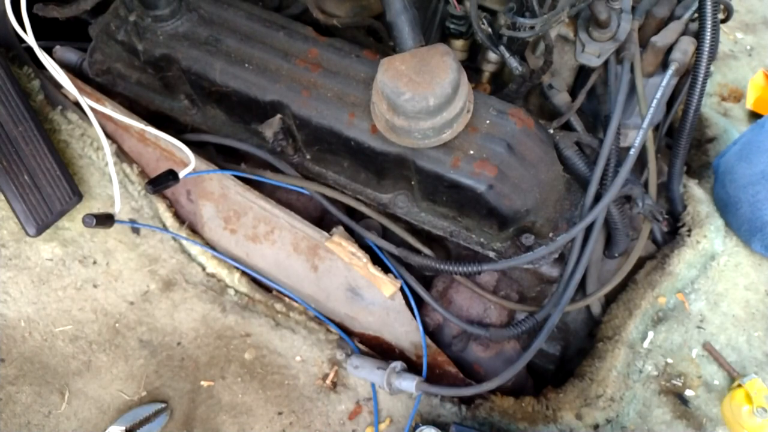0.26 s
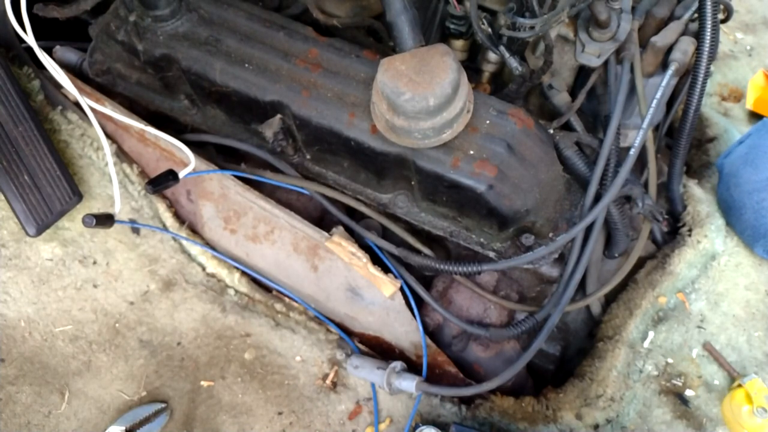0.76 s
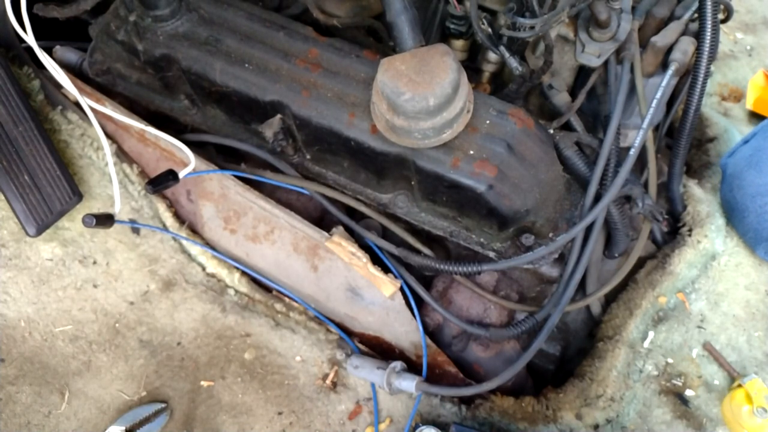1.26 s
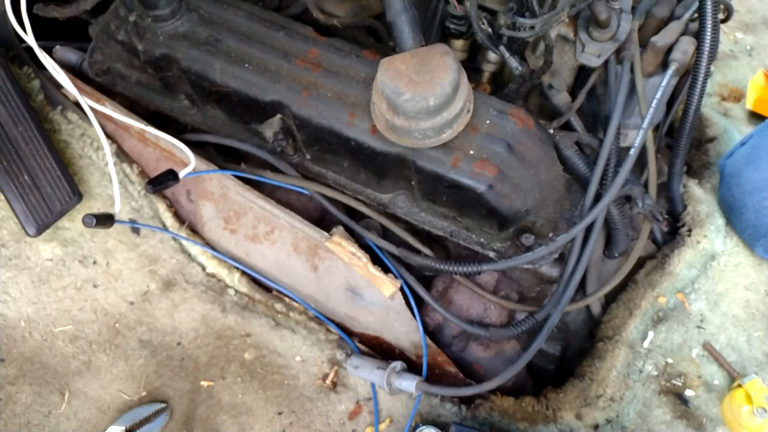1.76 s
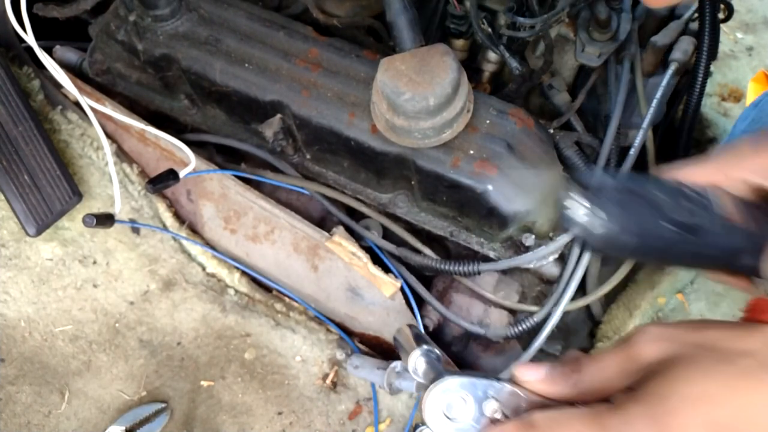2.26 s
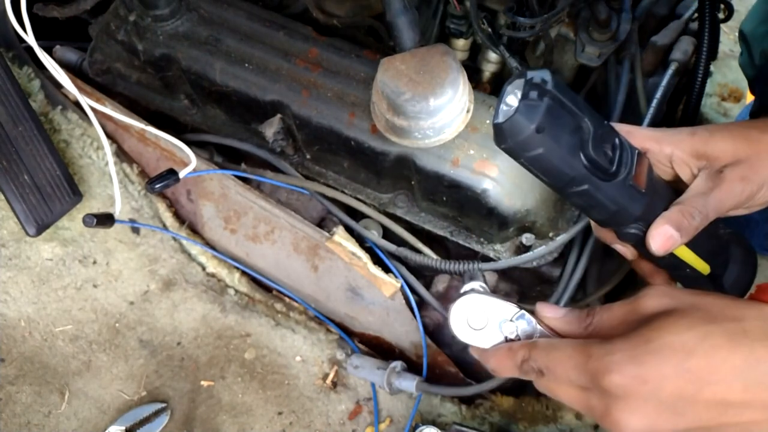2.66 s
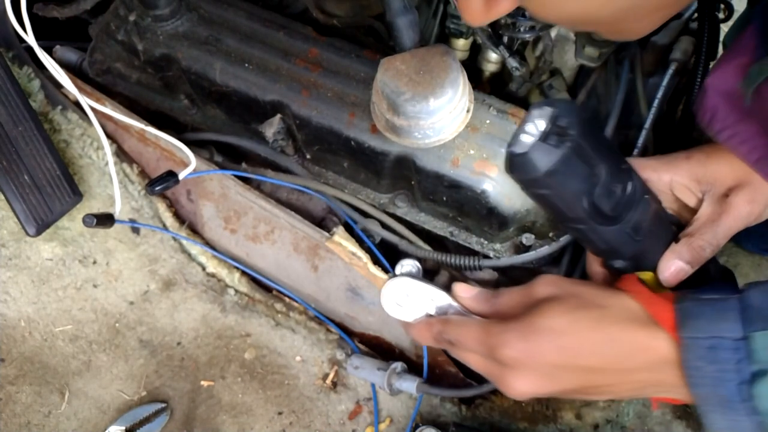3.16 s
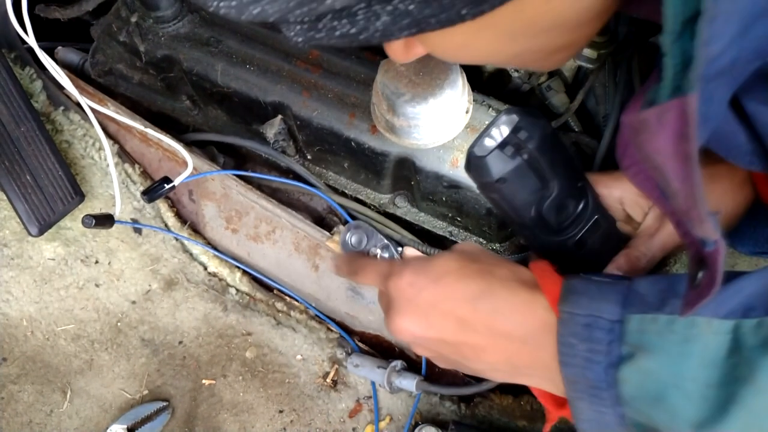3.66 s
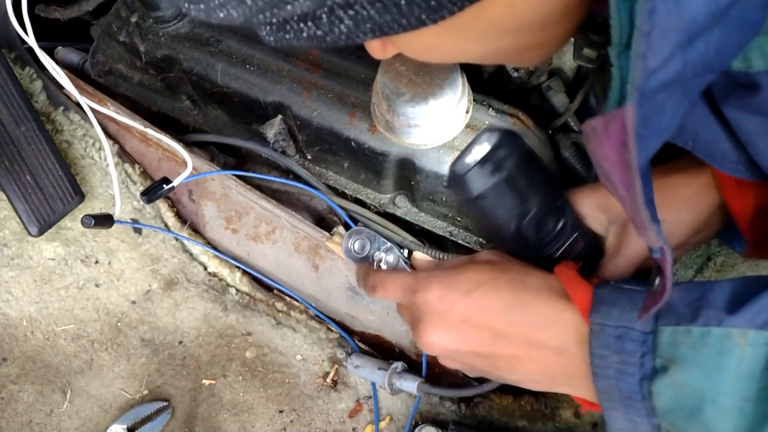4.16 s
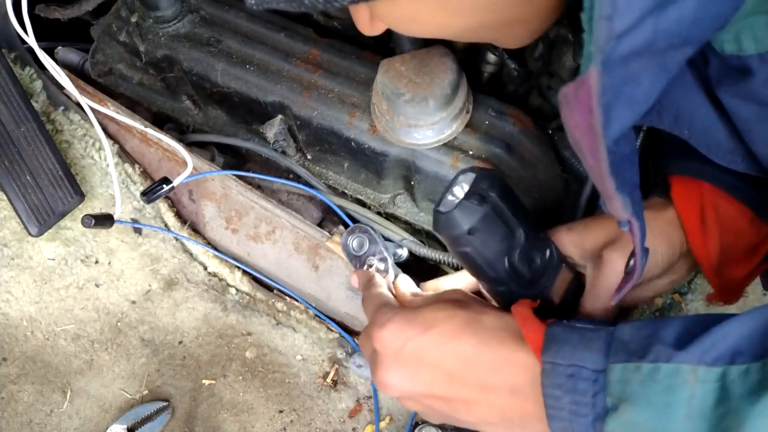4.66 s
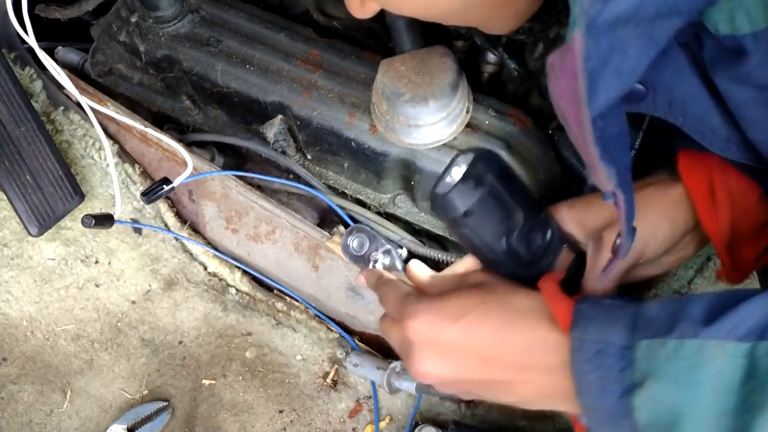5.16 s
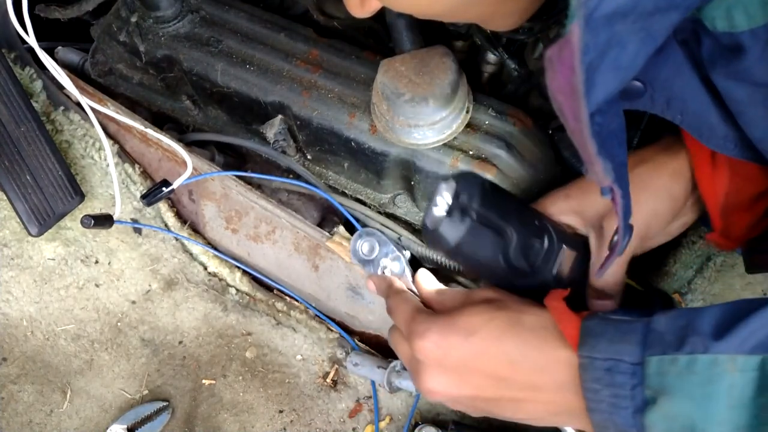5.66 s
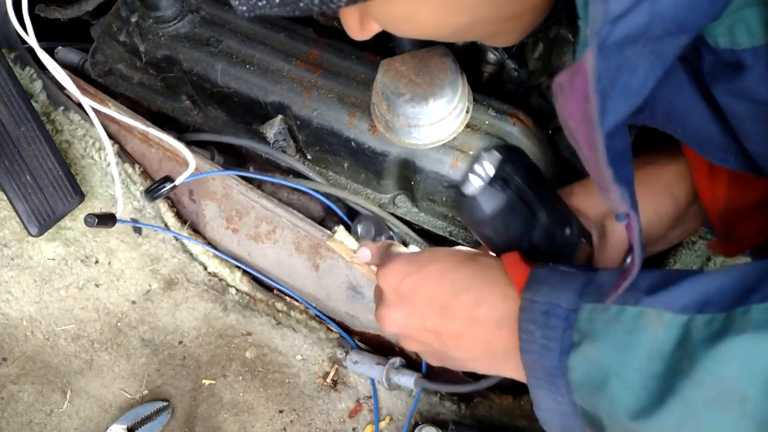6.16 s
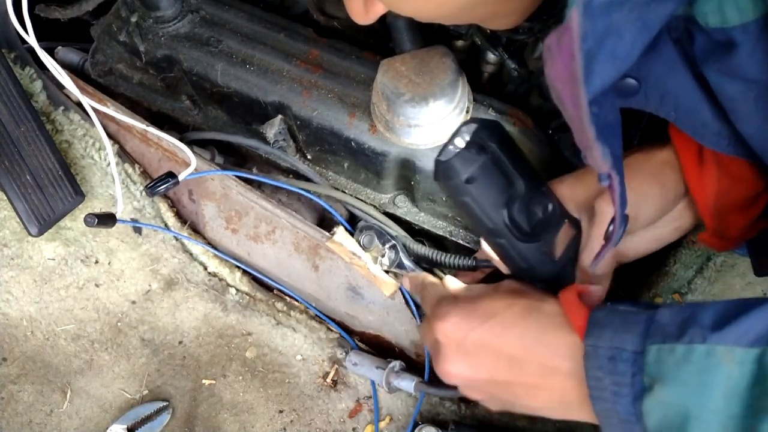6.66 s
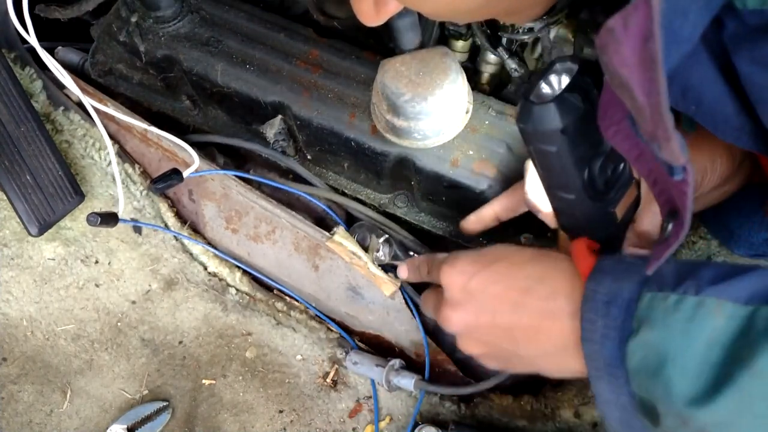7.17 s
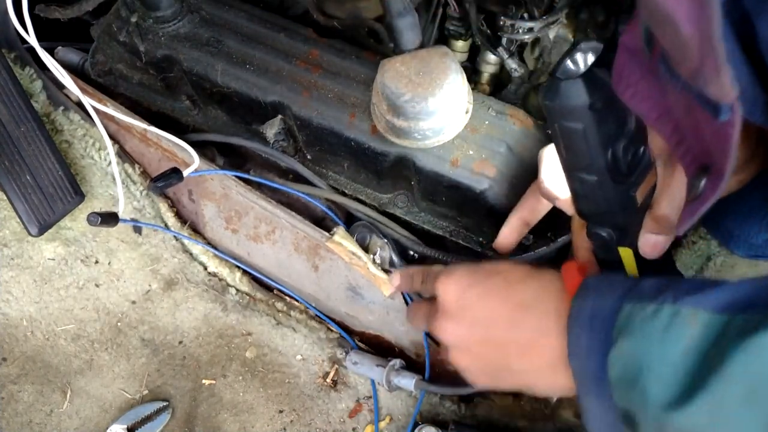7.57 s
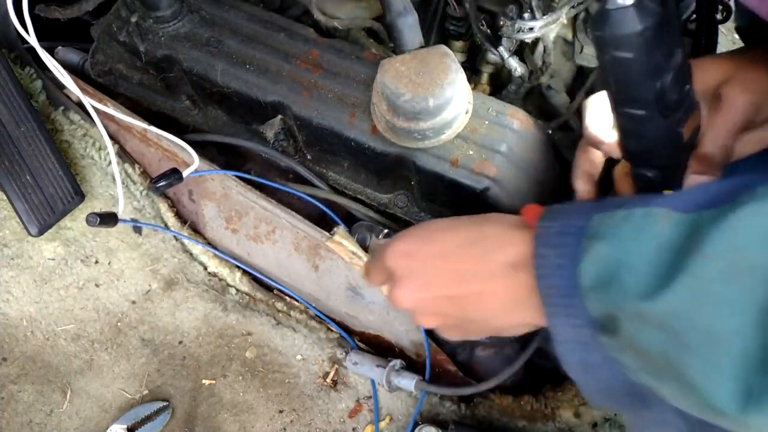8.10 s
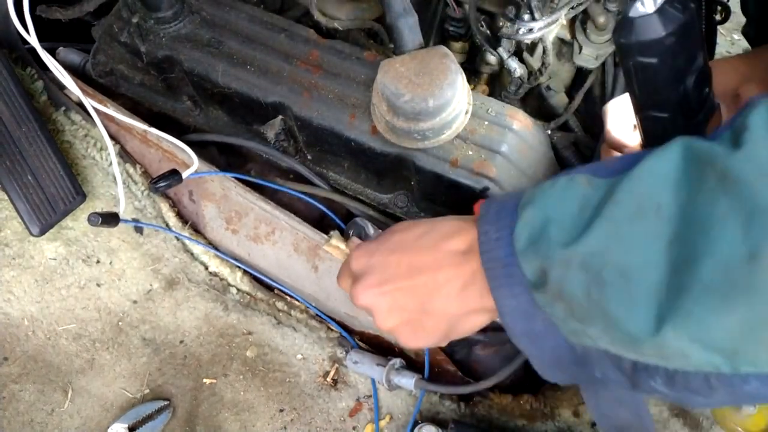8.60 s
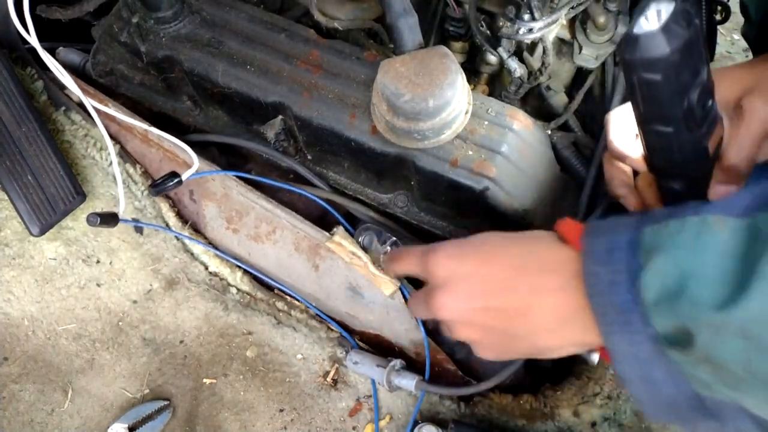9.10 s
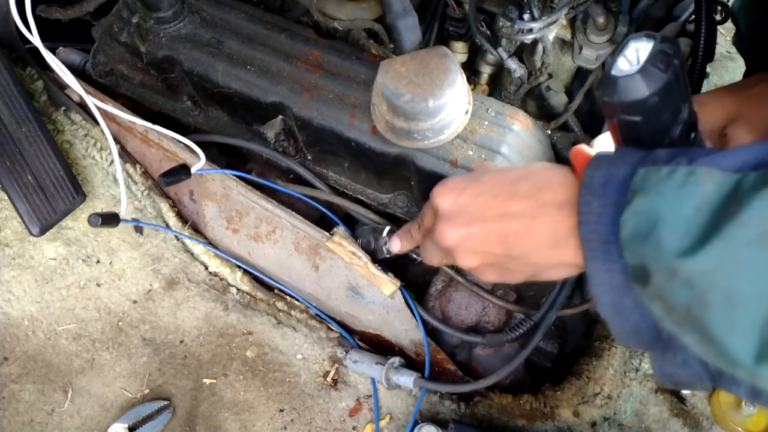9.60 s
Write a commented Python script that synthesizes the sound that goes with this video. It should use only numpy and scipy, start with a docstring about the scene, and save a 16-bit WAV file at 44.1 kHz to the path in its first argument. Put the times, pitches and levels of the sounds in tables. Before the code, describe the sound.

A ratchet with extension and socket is fitted onto an engine through a floor opening. Mostly quiet: cloth swishes, dull floor bumps, a short rough drag, bright clinks, sparse dry ticks and tiny steel scrapes. A clear tap comes past the middle, a hollow metal knock later, and a hard crack near the end. Faint outside traffic and a wavering low engine note sit under steady microphone hiss.

```python
"""In a van, a ratchet, extension and socket are worked down through the floor hatch onto an engine.
Struck steel rings as sums of decaying modes over dense noise; scrapes and drags are noise broken by slips.
A nylon sleeve rustles as grainy noise that swells with each stroke, and a small bird peeps in two pairs.
Traffic hums faintly outside as banded noise and one wavering tone, over a steady microphone hiss."""
import sys
import numpy as np
from scipy import signal
from scipy.fft import rfft, irfft
from scipy.io import wavfile

SR = 44100
rng = np.random.default_rng(int(sys.argv[2]) if len(sys.argv) > 2 else 0)


def dump(signal):
    """Clip the signal to [-1, 1] and save it as 16-bit WAV at the path in sys.argv[1]."""
    limited = np.clip(np.atleast_2d(signal).T, -1, 1)
    pcm = np.round(limited * 32767).astype(np.int16)
    wavfile.write(sys.argv[1], SR, pcm)


N = 433944
LEAD = 256  # samples kept before the onset of each blow
TIME = np.arange(N) / SR
AGE = (np.arange(24000) - LEAD) / SR  # seconds since the onset of a blow


def amp(db):
    """Logarithmic level: converts decibels to an amplitude gain."""
    return 10 ** (np.asarray(db) / 20)


def unit(x):
    """Energy normalisation: scales a signal to rms 1."""
    return x / np.sqrt(np.mean(x ** 2) + 1e-20)


def read(points, hz):
    """Logarithmic pitch scale: interpolates (Hz, value) points along log frequency."""
    f, value = np.transpose(points)
    return np.interp(np.log(hz + 1), np.log(f + 1), value)


def curves(rows):
    """Linear interpolation: draws each column of a time table sample by sample."""
    s, *columns = np.transpose(rows)
    return [np.interp(TIME, s, c) for c in columns]


def add(mix, s, sound):
    """Superposition: mixes a sound in, its onset LEAD samples after its first sample."""
    part = mix[:, max(round(s * SR) - LEAD, 0):][:, :sound.shape[-1]]
    part += sound[..., :part.shape[1]]


def likeness(hz):
    """Spatial coherence: two microphones hear the bass nearly alike and the treble unrelated."""
    return .95 / (1 + (hz / 500) ** 2)


def noise(colour, size, lo_hz=20, hi_hz=20000):
    """Filtered random noise: two partly coherent channels of rms 1 between two soft band edges."""
    hz = np.fft.rfftfreq(size, 1 / SR)
    a, b = rng.standard_normal((2, len(hz))) + 1j * rng.standard_normal((2, len(hz)))
    same = likeness(hz)
    pair = np.array([a, same * a + np.sqrt(1 - same ** 2) * b])
    low_edge, high_edge = 1 + (lo_hz / (hz + 1)) ** 10, 1 + (hz / hi_hz) ** 10
    edges = 1 / np.sqrt(low_edge * high_edge)
    return unit(irfft(pair * amp(read(colour, hz)) * edges, size))


def wander(per_s):
    """Random modulation: joins chance values, per_s of them a second, by lines at rms 1."""
    knots = rng.standard_normal(N // 20)
    return unit(np.interp(TIME * per_s, np.arange(len(knots)), knots))


def fade(t60, rise):
    """Exponential damping: a quick rise, then a decay of 60 dB in t60 seconds."""
    t = np.maximum(AGE, 0)
    return (1 - np.exp(-t / rise)) * np.exp(-np.log(1000) * t / t60)


# Ringing time of the engine bay and the cab, scaled by the length of each blow.
# Each row: frequency in Hz, decay time t60 in seconds.
SPACE_T60 = [(100, 0.69), (350, 0.3), (900, .13), (2000, 0.15), (5000, 0.087), (10000, 0.061),
             (16000, 0.05)]


def strike(modes, clang, mode_db, crack_db, rise, length=0.95, damping=1.):
    """Modal superposition: a contact crack, a dense clang damped band by band, and the part's clear modes."""
    dense = noise(clang, len(AGE), lo_hz=65)
    hz, spectrum = np.fft.rfftfreq(len(AGE), 1 / SR), rfft(dense)
    centres, t60s = np.transpose(SPACE_T60)
    out = amp(crack_db) * dense * fade(0.014, rise / 2)
    for share, t60 in zip(np.eye(len(centres)), t60s):
        band = irfft(spectrum * read(np.c_[centres, share], hz))
        out += band * fade(t60 * length, rise)
    ring = np.zeros_like(out)
    for f, db, t60 in modes:
        # short waves reach the two microphones out of step
        lag = (1 - likeness(f / 2)) * rng.uniform(-1.4, 1.9, (2, 1))
        phase = 2 * np.pi * rng.random() + lag
        # low modes build up more slowly
        envelope = fade(t60 / damping, rise + 0.62 / f)
        ring += amp(db) * np.sin(2 * np.pi * f * AGE + phase) * envelope
    return out + amp(mode_db) * ring


def voiced(sound, centres, levels_db, seconds):
    """Contact spectrum: the point and hardness of contact set each broad band's level in the first moments."""
    hz, spectrum = np.fft.rfftfreq(len(AGE), 1 / SR), rfft(sound)
    shares = np.array([read(np.c_[centres, row], hz) for row in np.eye(len(centres))])
    early = rfft(sound * (AGE < seconds))
    power = 2 * (abs(early) ** 2).mean(0) / (len(AGE) * seconds * SR)
    gain = np.ones(len(hz))
    for _ in range(2):  # bands overlap, so the balance is refined once
        now_db = 10 * np.log10(shares ** 2 @ (power * gain ** 2) + 1e-20)
        gain = gain * amp(read(np.c_[centres, np.array(levels_db) - now_db], hz))
    return irfft(spectrum * gain)


def panned(sound, left_db):
    """Interaural level difference: makes the left side louder than the right by left_db."""
    return np.array([sound[0] * amp(left_db / 2), sound[1] * amp(-left_db / 2)])


# Centres of the broad bands of a heavy blow [Hz].
BLOW_BANDS_HZ = [170, 290, 450, 850, 1400, 2200, 5000, 11000]
# The tool knocks on the valve cover. Each row: start in seconds, target level in dB in each of the eight
# BLOW_BANDS_HZ, contact crack in dB against the clang.
COVER_KNOCKS = [(4.592, -50, -49.5, -49.5, -48.5, -41.5, -36.5, -41.5, -43, 9),
                (4.9091, -49.5, -47, -41.5, -43.5, -41, -35, -42.5, -42, 7.5),
                (7.335, -35.5, -40, -26.5, -29.5, -36, -23, -21.5, -28.5, -1.5)]
# Modes of the valve cover. Each row: frequency in Hz, relative level in dB, t60 in seconds before damping.
COVER_MODES = [(123, -16, .18), (186, -22, .26), (307, -18, .21), (371, -16, .15), (432, -4, .145),
               (704, -9, .11), (850, -13, .15), (980, -22, .18), (1074, -11, .13), (1430, -6, .07),
               (1620, -10, .07), (1763, -3, .08), (1875, -5, .1), (1942, 1.5, .085), (2145, -4, .085),
               (2358, -8, .07), (2484, -6, .08), (2637, -1, .08), (2730, -4, .08), (2843, -4, .075),
               (3060, -6, .07), (3314, -15, .18), (4135, -5, .065), (4346, -7, .07), (4584, 3, .065),
               (4700, -21, .18), (4858, -4, .065), (4975, -5, .07), (5308, -10, .075), (6056, -9, .055),
               (7070, -9, .06), (8200, -12, .056)]
# Colour of the cover's dense ringing. Each row: frequency in Hz, relative level in dB.
COVER_DENSE = [(60, -22), (120, -7.5), (240, -9.5), (430, -4), (570, -5.5), (850, 0), (1400, -12.5),
               (1900, -3.5), (2800, -3.5), (3500, -1), (4700, 2.5), (9000, -14), (10500, -18.5),
               (16000, -32)]


def knocks():
    """Impact on a hollow shell: the extension bumps the valve cover and excites its many modes."""
    out = np.zeros((2, N))
    for s, *levels_db, crack_db in COVER_KNOCKS:
        blow = strike(COVER_MODES, COVER_DENSE, mode_db=1.5, crack_db=crack_db, rise=.0016, damping=1.08)
        add(out, s, voiced(blow, BLOW_BANDS_HZ, levels_db, seconds=0.036))
    return out


# The socket drops hard onto the block. Each row: start in seconds, target level in dB in each of the eight
# BLOW_BANDS_HZ, contact crack in dB against the clang.
BLOCK_LANDINGS = [(9.4885, -63, -49, -48, -36, -37, -28.5, -23.5, -28, 14)]
# Modes of the block. Each row: frequency in Hz, relative level in dB, t60 in seconds before damping.
BLOCK_MODES = [(272, -13.5, .55), (431, -17, .25), (829, -4, .11), (1825, -10, .08), (2137, -6, .07),
               (2277, -12, .07), (2568, -10, .075), (3725, -5, .06), (4829, -5, .06), (5028, -4, .048),
               (5647, 2, .05), (6132, -4, .06), (6433, -3, .055), (6654, -6, .055), (6988, -9, .06),
               (7752, -12, .06), (10250, -5, .06)]
# Colour of the block's dense ringing. Each row: frequency in Hz, relative level in dB.
BLOCK_DENSE = [(100, -21), (450, -7), (850, 1), (1000, -8.5), (1400, -11), (2200, -12), (4300, -8),
               (6200, 1), (7800, -13), (10500, -17), (13000, -19), (16000, -9.5)]


def landing():
    """Hard impact: the socket lands on the block, and the brief contact gives a sharp crack."""
    out = np.zeros((2, N))
    for s, *levels_db, crack_db in BLOCK_LANDINGS:
        blow = strike(BLOCK_MODES, BLOCK_DENSE, mode_db=-1.0, crack_db=crack_db, rise=0.0004,
                      length=0.8, damping=1.38)
        add(out, s, voiced(blow, BLOW_BANDS_HZ, levels_db, seconds=0.034))
    return out


# Centres of the broad bands of a light contact [Hz].
LIGHT_BANDS_HZ = [600, 2000, 5000, 11000]
# The socket clinks on its extension. Each row: start in seconds, relative level in dB in each of the four
# LIGHT_BANDS_HZ, contact crack in dB against the clang.
SOCKET_CLINKS = [(1.7467, -66, -39.5, -32.5, -31.5, 11), (1.8414, -63, -44, -35, -29.5, 11)]
# Modes of the socket. Each row: frequency in Hz, relative level in dB, t60 in seconds before damping.
SOCKET_MODES = [(3208, -10, .069), (3892, -5, .045), (4081, -11, .056), (4425, -4, .04), (5324, -11, .045),
                (5486, -10, .04), (6019, -11, .05), (9615, 1, .052), (9981, -12, .07), (10271, -15, .07)]
# Colour of the socket's dense ringing. Each row: frequency in Hz, relative level in dB.
SOCKET_DENSE = [(100, -49.5), (1000, -32), (2000, -11.5), (4000, 3.5), (6800, -4), (8700, -2), (9700, 7.5),
                (10600, -2), (11400, -24.5), (13000, -7.5), (16000, -17.5)]


def clinks():
    """Interaural delay: small steel parts click in the hand off to the right, so the left hears them late."""
    out = np.zeros((2, N))
    for s, *levels_db, crack_db in SOCKET_CLINKS:
        blow = strike(SOCKET_MODES, SOCKET_DENSE, mode_db=3, crack_db=crack_db, rise=.0004,
                      length=.7, damping=1.1)
        add(out, s, voiced(blow, LIGHT_BANDS_HZ, levels_db, seconds=0.031))
    late = np.interp(TIME - .0005, TIME, out[1])
    same = .55  # share of the left side that copies the right
    left = same * late + np.sqrt(1 - same ** 2) * out[0]
    return panned(np.array([left, out[1]]), left_db=-6.5) * amp(-0.6)


# Modes of the ratchet. Each row: frequency in Hz, relative level in dB, t60 in seconds before damping.
RATCHET_MODES = [(1660, -3, .06), (2400, -1, .07), (2830, -8, .06), (3900, -2, .06), (4350, -1, .06),
                 (4780, -5, .05), (6350, -2, .05), (7200, -7, .05), (10100, -7, .04)]
# Colour of the ratchet's dense ringing. Each row: frequency in Hz, relative level in dB.
RATCHET_DENSE = [(100, -12), (500, -2.5), (2000, 10), (5000, -3.5), (9000, -4.5), (16000, -13.5)]
TICK_T60_S, TICK_PIVOT_HZ = 0.095, 5230  # clang decay of an untilted tick at the pivot
TICK_SHORTENING = 0.099  # brighter, smaller parts die sooner: exponent per dB of tilt


def tick(db, tilt_db, cut_hz):
    """Damped impact: one light contact rings the ratchet, damped by the hand that holds it."""
    hz = np.array(LIGHT_BANDS_HZ)
    length = TICK_T60_S * np.exp(-TICK_SHORTENING * tilt_db) / read(SPACE_T60, TICK_PIVOT_HZ)
    softness_db = 10 * np.log10(1 + (hz / cut_hz) ** 8)
    levels_db = db + tilt_db * np.log2(hz / TICK_PIVOT_HZ) - softness_db
    blow = strike(RATCHET_MODES, RATCHET_DENSE, mode_db=-6, crack_db=9, rise=0.0005,
                  length=length, damping=0.72 / length)
    return voiced(blow, LIGHT_BANDS_HZ, levels_db, seconds=0.031)


# Light touches and play in the joints; small parts tilt bright, soft contacts cut off early. Each row:
# start in seconds, relative level in dB, tilt in dB per octave, contact cut-off in Hz.
TOUCHES = [(0.815, -51, 0.5, 3680), (.936, -58, -0.5, 14000), (1.017, -55.5, 3, 15000),
           (1.993, -46, 2, 4700), (2.724, -62.5, 3, 4990), (3.313, -69.5, -3, 3790), (3.372, -60, 3, 5200),
           (3.39, -63, 2, 10000), (3.407, -62, 1, 11000), (4.071, -53.5, 7, 7750), (4.27, -65, 4, 10000),
           (4.412, -67.5, -1, 13000), (4.713, -59.5, 1, 3210), (5.745, -62.5, 8, 6500),
           (5.91, -57.5, 9, 5800), (5.936, -59, 1, 9000), (6.214, -40.5, 7, 5080), (6.542, -62.5, 1, 11040),
           (6.72, -60.5, 2, 5800), (6.74, -58, 2.5, 6000), (6.991, -58.5, 4.5, 5800),
           (7.062, -48, 5.5, 4700), (7.493, -56, 7, 3400), (7.543, -61, 7.5, 8000), (7.725, -63.5, 4, 7480),
           (8.041, -61.5, 4, 6200), (8.378, -65.5, 1, 10000), (8.732, -62, 5.5, 8970),
           (9.09, -53.5, 6.5, 6800), (9.108, -63.5, -2.5, 6000), (9.168, -55, 9, 8060),
           (9.262, -49.5, 5, 5300)]
# Where the tool is. Each row: time in seconds, left minus right in dB.
TOOL_PLACE = [(.8, -3.5), (2, -2.5), (4.1, 2.5), (6.2, 2.5), (7.1, -1), (9.3, -.5)]
# fainter play comes by chance while the tool is held
PLAY_FROM_S, PLAY_DB, PLAY_SPREAD_DB = 3.8, -72.5, 3.5
PLAY_TILT_DB, PLAY_CUT_HZ = 1.5, 9400  # tilt per octave


def ticks(count=10):
    """Repeated impacts: the tool's clear touches, and faint play at random moments."""
    out = np.zeros((2, N))
    for s, *touch in TOUCHES:
        add(out, s, tick(*touch))
    for when, force in rng.random((count, 2)):
        s = PLAY_FROM_S + when * (TIME[-1] - PLAY_FROM_S)
        db = PLAY_DB + PLAY_SPREAD_DB * (2 * force - 1)
        add(out, s, tick(db, PLAY_TILT_DB, PLAY_CUT_HZ))
    return panned(out, *curves(TOOL_PLACE))


# Steel slides on steel. Each row: start in seconds, end in seconds, level in dB reached before the closing
# fade, swell in dB over the slide, most excited frequency in Hz.
STEEL_SCRAPES = [(0.26, 0.45, -57, -1, 1970), (1.225, 1.263, -56.5, 1, 3930),
                 (1.769, 1.847, -42.5, 18.5, 3700), (3.517, 3.722, -69.5, -4, 4300),
                 (4.898, 4.91, -46, 6, 1200), (5.469, 5.54, -67, 4, 2500), (6.003, 6.197, -62, 5, 2500),
                 (6.058, 6.211, -52.5, 11.5, 5040), (6.83, 6.994, -57.5, 11, 4420),
                 (9.132, 9.471, -67, -11, 1670), (9.477, 9.494, -35, 3, 2600)]


def scrapes():
    """Stick-slip friction keeps the ratchet's modes humming; the place of contact favours some of them."""
    out = np.zeros((2, N))
    for start, end, db, swell_db, focus_hz in STEEL_SCRAPES:
        size = max(round((end - start) * SR), LEAD)
        hz = np.fft.rfftfreq(size, 1 / SR)
        slips = noise(RATCHET_DENSE, size) * amp(2.2 * wander(360)[:size])
        modes = sum(amp(mode_db) / (1 + 2j * (hz - f) / 140) for f, mode_db, _ in RATCHET_MODES)
        focus = np.exp(-(np.log2((hz + 1) / focus_hz) / .5) ** 2)
        rub = unit(irfft(rfft(slips) * (abs(modes) + 0.036) * focus, size))
        swell = amp(db + np.linspace(-swell_db, 0, size))
        add(out, start + LEAD / SR, rub * swell * signal.windows.tukey(size, .25))
    return panned(out, *curves(TOOL_PLACE))


# Dull bumps on the floor and the hatch rim. Each row: start in seconds, relative level in dB.
FLOOR_BUMPS = [(0.817, -53), (0.898, -53), (1.001, -44), (1.077, -50.5), (1.115, -53.5), (1.982, -64),
               (4.72, -58), (5.83, -60), (9.108, -77)]


def bumps():
    """Damped low-frequency impact: the tool meets the floor in short thuds of low noise."""
    out = np.zeros((2, N))
    for s, db in FLOOR_BUMPS:
        thud = noise([(100, -12), (230, -11.5), (340, 10.0), (560, 7.5), (900, -5), (3000, -41)], len(AGE))
        add(out, s, amp(db + 9.0) * thud * fade(0.098, 0.00081))
    return out


# The tool drags over the floor. Each row: time in seconds, level in dB.
FLOOR_DRAG = [(1.0, -61), (1.018, -48.5), (1.042, -38.5), (1.08, -37.5), (1.094, -46.5), (1.105, -53),
              (1.12, -48.5), (1.15, -72)]
# Colour of the drag. Each row: frequency in Hz, relative level in dB.
FLOOR_DRAG_COLOUR = [(120, -46), (200, -11), (329, -1), (787, -16), (888, -29), (1020, -4), (1090, -35),
                     (1320, -6), (1890, -6.5), (2060, 1.5), (2240, -9.5), (3560, -11), (3870, -14.5),
                     (7560, -23.5), (12000, -34), (15600, -66), (22000, -120)]


def drag():
    """Sliding friction: the tool drags over the floor in tiny slips."""
    level_db, = curves(FLOOR_DRAG)
    sliding = (TIME > FLOOR_DRAG[0][0]) & (TIME < FLOOR_DRAG[-1][0])
    slips = unit(amp(2.5 * wander(300)))
    return sliding * amp(level_db) * noise(FLOOR_DRAG_COLOUR, N) * slips


# Strokes of the arm that rub the sleeve. Each row: time of fastest motion in seconds, length at half power
# in seconds, relative level in dB, brightness in dB.
ARM_STROKES = [(0.016, 0.17, -57.5, -0.5), (0.3, 0.2, -56.5, 5), (.53, 0.24, -58.5, -1), (1.0, 1, -64, -3),
               (1.533, 0.22, -56.5, 3), (1.777, 0.23, -58, 3.5), (2.156, 0.22, -56.5, 1),
               (2.429, 0.38, -65.5, 2), (3.28, 0.41, -70.5, 5.5), (3.608, 0.17, -67.5, 3.5),
               (4.455, 0.35, -69, -1.5), (5.22, 0.14, -68, -5), (5.882, .2, -70.5, -7),
               (6.16, 0.11, -61.5, 3.5), (6.521, 0.37, -69, -4), (7.055, 0.39, -68, -2.5),
               (7.583, 0.39, -71.5, -3), (8.199, 0.24, -62.5, 0), (8.58, 0.18, -65.5, 0),
               (9.104, 0.41, -68.5, -1), (9.485, 0.2, -67, -9)]
# Colour of the nylon. Each row: frequency in Hz, relative level in dB.
NYLON_COLOUR = [(470, -38.5), (800, -5.5), (965, -1.5), (1140, 5), (1300, -1.5), (1700, -5), (2150, -4.5),
                (2350, -4.5), (2980, -4.5), (3600, -2.5), (4860, -6), (6330, -6), (11300, -16),
                (15000, -9.5), (16000, -13.5)]
# The arm comes in from the right. Each row: time in seconds, left minus right in dB.
ARM_PLACE = [(0, -4), (1.6, -3.5), (2.9, -2.5), (3.4, -.5), (6.2, 0), (9.84, -2)]
RESTING_DB = -76.5  # the sleeve never lies quite still; relative level
BODY_DB, SWISH_DB, FIZZ_DB = .5, 1, -2  # balance of the three bands
BODY_LOSS = 0.15  # dB of body lost for each dB of brightness
CATCH_DB, CATCHES_PER_S = 1.0, 14  # folds catch and let go within a stroke


def sleeve():
    """Textile friction: strokes swell and ebb, the weave catches in small grains, taut cloth hisses brighter."""
    power, lit = np.full(N, amp(RESTING_DB) ** 2), np.zeros(N)
    for s, seconds, db, bright_db in ARM_STROKES:
        stroke = amp(db) ** 2 * .5 ** ((2 * (TIME - s) / seconds) ** 2)
        power, lit = power + stroke, lit + stroke * bright_db
    bright_db = lit / power  # mean brightness weighted by power
    left_db, = curves(ARM_PLACE)
    weave_db = .9 * wander(400) + .6 * wander(45)
    grain = unit(amp(weave_db + CATCH_DB * wander(CATCHES_PER_S)))
    body = amp(BODY_DB - BODY_LOSS * bright_db) * noise(NYLON_COLOUR, N, lo_hz=1400, hi_hz=2960)
    swish = amp(SWISH_DB) * noise(NYLON_COLOUR, N, lo_hz=3340, hi_hz=8200)
    fizz = amp(FIZZ_DB + bright_db) * noise(NYLON_COLOUR, N, lo_hz=7660)
    return panned(np.sqrt(power) * grain * (body + swish + fizz), left_db)


# Bird notes. Each row: start in seconds, length in seconds, start, middle and end pitch in Hz about which
# the note wavers, level in dB.
BIRD_NOTES = [(2.434, 0.08, 8400, 8480, 8700, -51.5), (2.528, 0.079, 8700, 8570, 8900, -57.5),
              (3.326, 0.088, 8650, 8530, 8540, -58.5), (3.437, 0.061, 8950, 8800, 9000, -61.5)]


def bird():
    """Frequency modulation: thin peeps glide along a parabola of pitch with a slight random waver."""
    out, waver = np.zeros((2, N)), wander(260)
    for s, seconds, start_hz, middle_hz, end_hz, db in BIRD_NOTES:
        u = np.linspace(0, 1, round(seconds * SR))
        hz = np.polyval(np.polyfit([0, .5, 1], [start_hz, middle_hz, end_hz], 2), u)
        hz = hz * (1 + 0.011 * waver[round(s * SR):][:len(u)])
        phase = 2 * np.pi * np.cumsum(hz) / SR + np.array([[0], [1]])  # the sides are 1 radian apart
        note = np.sin(phase) * signal.windows.tukey(len(u), .45)
        add(out, s + LEAD / SR, np.sqrt(2) * amp(db) * note)
    return out


# Outside noise. Each row: time in seconds, relative levels in dB of rumble, road wash and tyre hiss.
STREET_LEVELS = [(0, -59.5, -60.5, -68), (2.15, -64.5, -63, -64.5), (2.8, -64.5, -72.5, -70.5),
                 (3.5, -64.5, -69, -66.5), (5.1, -59.5, -66, -63.5), (5.7, -62.5, -69, -65),
                 (7.3, -57.5, -64.5, -65), (8.7, -61, -66, -68), (9.84, -59.5, -67, -65.5)]
# Colour of the outside noise. Each row: frequency in Hz, relative level in dB.
OUTSIDE_COLOUR = [(15, -49), (25, -25), (49, -15), (80, -4), (102, -5.5), (121, -5), (154, -15.5),
                  (248, -16.5), (344, -20), (476, -15), (555, -19.5), (838, -16), (994, -22.5), (1500, -21),
                  (1950, -57.5), (3300, -120)]
# A distant engine. Each row: time in seconds, mean pitch in Hz, relative level in dB.
ENGINE_HUM = [(0, 94, -76.5), (2.5, 101, -65), (4.6, 96, -67), (5.2, 110, -60.5), (6.35, 103, -62.5),
              (6.8, 103, -52.5), (7.9, 113, -59), (9.84, 111, -59.5)]
SWELLS_PER_S, RUMBLE_SWELL_DB, WASH_SWELL_DB = 4.3, 1.1, 1.28  # swells are rms


def street():
    """Sound transmission: rumble, wash, distant tyres and a wavering engine note come in through the van body."""
    rumble_db, wash_db, tyres_db = curves(STREET_LEVELS)
    hz, hum_db = curves(ENGINE_HUM)
    rumble_gain = amp(rumble_db + RUMBLE_SWELL_DB * wander(SWELLS_PER_S))
    rumble = rumble_gain * noise(OUTSIDE_COLOUR, N, hi_hz=189)
    wash_gain = amp(wash_db - 0.5 + WASH_SWELL_DB * wander(SWELLS_PER_S))
    wash = wash_gain * noise(OUTSIDE_COLOUR, N, lo_hz=203, hi_hz=610)
    tyres = amp(tyres_db) * noise(OUTSIDE_COLOUR, N, lo_hz=635, hi_hz=1140)
    turns = np.cumsum(hz * (1 + 0.018 * wander(14))) / SR
    hum = np.sqrt(2) * amp(hum_db - 4 + 2.2 * wander(10.0)) * np.sin(2 * np.pi * turns)
    return panned(rumble + wash + tyres + hum, left_db=0.24)


def hiss():
    """Self-noise: the microphones' own faint, steady hiss."""
    return amp(-73) * noise([(500, 0), (1500, 0), (3000, -3), (8000, -9), (16000, -14)], N, lo_hz=900)


def scene():
    """Linear superposition: all sources sum at the two microphones."""
    tool = knocks() + landing() + clinks() + ticks() + scrapes() + bumps() + drag()
    return tool + sleeve() + bird() + street() + hiss()


LOW_CUT_HZ = 34


def record(dry):
    """Band limitation: the microphones' low cut, the full-scale limit, then a low-pass."""
    thinned = signal.lfilter(*signal.butter(2, LOW_CUT_HZ, "high", fs=SR), dry)
    low_pass = signal.firwin(511, 16000, window=("kaiser", 9), fs=SR)
    return signal.oaconvolve(np.clip(thinned, -1, 1), low_pass[None], "same", axes=1)


dry = scene()
out = record(dry)
dump(out)
```